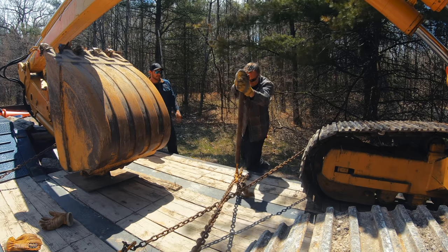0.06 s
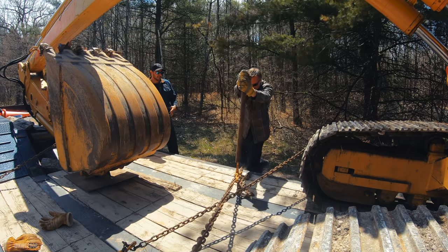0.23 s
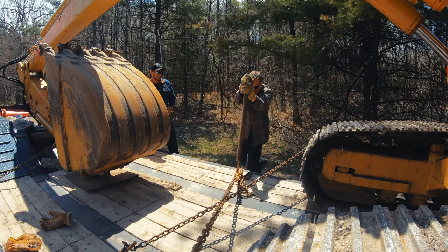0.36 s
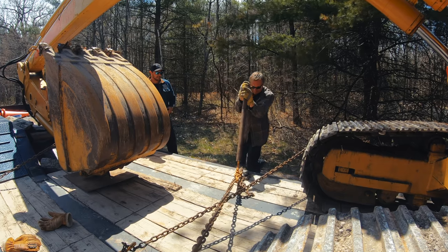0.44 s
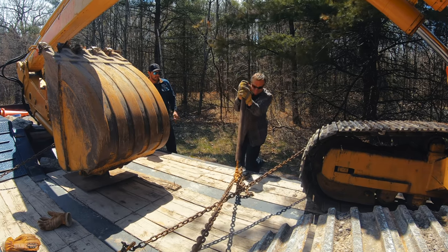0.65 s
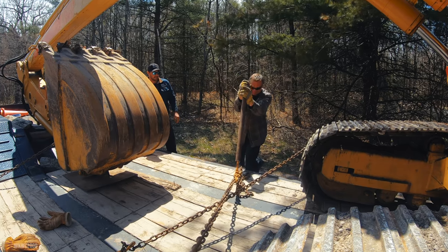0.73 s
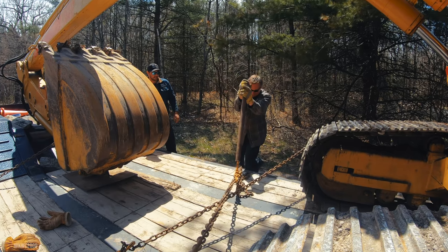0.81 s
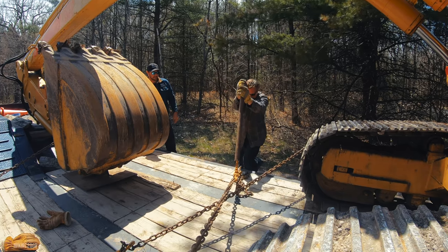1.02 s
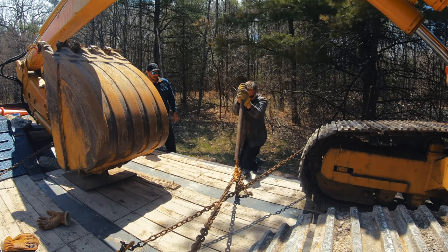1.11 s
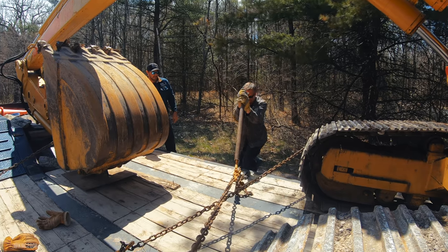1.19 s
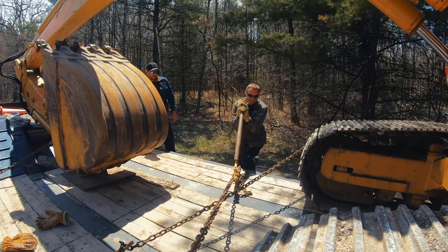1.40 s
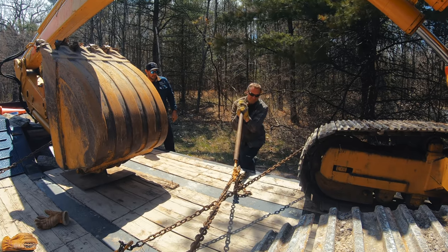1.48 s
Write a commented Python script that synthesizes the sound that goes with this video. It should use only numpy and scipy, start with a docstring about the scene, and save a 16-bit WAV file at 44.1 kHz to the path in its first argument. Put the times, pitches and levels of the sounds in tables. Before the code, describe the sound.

Steel lever binder snaps closed with a knock and booming clank, then chain links rattle and settle outdoors

```python
"""Outdoors by a wood, close to a wooden trailer deck: a lever chain binder is forced shut with a bar.
Faint scuffs come first, then a tick and dull knock, a sharp clack and the heavy clank that booms the deck.
The taut chain rattles and rings; then loose links clink, and the bar and chain scuff and bump as they settle.
Blows are decaying noise bands, steel is decaying sines; trees and deck reflect the work to the microphone.
Throughout there is outdoor air, a faint far drone and hiss; light wind rocks the microphone."""
import sys
import numpy as np
from scipy import signal
from scipy.io import wavfile

SR = 44100
rng = np.random.default_rng(int(sys.argv[2]) if len(sys.argv) > 2 else 0)


def transcribe(signal):
    """Save signal, clipped to [-1, 1], as a 16-bit WAV file at the path in sys.argv[1]."""
    frames = np.atleast_2d(signal).T
    limited = np.clip(frames, -1, 1)
    pcm = np.round(limited * 32767).astype(np.int16)
    wavfile.write(sys.argv[1], SR, pcm)


N = 68355
T = np.arange(N) / SR

# Binder blows. Each: start in seconds, level in dB.
KNOCK, CLACK, CLANK = (.2285, -12.5), (.3188, -12), (.3635, -8)
# Spectrum of each blow. Each row: frequency in Hz, relative level per Hz in dB.
KNOCK_COLOUR = [(40, 5), (180, 2.5), (350, -1.5), (600, 0.5), (950, 0.5), (1350, 6.5), (2000, -7.5),
                (3000, -8.5), (4200, -24.5), (8000, -31.5), (15000, -42.5)]
CLACK_COLOUR = [(100, -18.5), (450, -6.5), (950, -11.5), (1330, 7.5), (1600, -6.5), (2100, 3), (2700, -4),
                (3400, -12), (5000, -13), (9000, -23.5), (15000, -23)]
CLANK_COLOUR = [(30, 0), (50, 7), (90, 9.5), (200, 10.5), (450, -4), (900, 1), (1350, 1), (2100, 4.5),
                (3000, -13.5), (5500, -6), (8500, -9.5), (10500, -24.5), (13500, -10), (16000, -22)]
# Ringing time of each blow. Each row: frequency in Hz, time to fall 60 dB in seconds.
KNOCK_DECAY = [(100, 0.35), (400, 0.46), (1200, .13), (3000, 0.087), (12000, 0.086)]
CLACK_DECAY = [(300, 0.59), (1300, .1), (4000, .08), (12000, 0.027)]
CLANK_DECAY = [(60, 0.47), (220, 0.12), (450, .22), (1300, 0.091), (4000, 0.12), (12000, .06)]
BUILD_CYCLES = 0.4  # time constant of a blow's swell, in cycles, so the lows come later
# First touch of steel before the knock; its level is that of the noise before the high-pass.
TICK_S, TICK_DB, TICK_T60_S = .2272, -21.5, 0.0059

# Deck modes under the clank. Each row: frequency in Hz, level in dB, time to fall 60 dB in seconds.
DECK_MODES = [(41.43, -15, 0.74), (66.1, -7, .52), (101.1, -12, 0.35), (190.1, -13, .22), (206.6, -1, .06),
              (237.5, -17.5, .14), (263.3, -30.5, 0.95), (352.9, -19.5, 0.34), (394.8, -21.5, 0.35),
              (461.5, -21, 0.19), (606, -26, .25)]
DECK_LAG_S = 0.0021  # after the clank

# Links slam together. Each row: start in seconds, level in dB, strongest pitch in Hz.
SLAMS = [(0.35, -20, 4400), (0.3659, -19.5, 8300), (.3685, -21.5, 6000), (.384, -26.5, 4800),
         (.405, -21, 5000), (0.421, -22.5, 5200), (.432, -22, 5300), (0.4397, -23, 4700),
         (0.4504, -21, 5000), (.4545, -20, 5500), (.469, -26.5, 5000), (.486, -20, 4600), (.490, -19, 5200),
         (0.5211, -18, 5200), (.526, -20, 5000)]
SLAM_PEAK_DB, SLAM_PEAK_OCTAVES = 7.5, 0.075  # boost around the strongest pitch, and its spread
# Spectrum of the links. Each row: frequency in Hz, relative mode level in dB.
LINK_COLOUR = [(150, -5), (500, -5), (800, -4.5), (1200, 4), (1600, -8), (2100, -1.5), (2900, -2),
               (3500, 0), (4000, -2.5), (5100, 3.5), (6500, -10), (8500, -3.5), (11000, -18),
               (14000, -11.5), (16000, -25)]
# Ringing time of the links. Each row: frequency in Hz, typical time to fall 60 dB in seconds.
LINK_DECAY = [(300, 0.079), (1300, .16), (5000, 0.09), (12000, 0.062)]
LINK_DECAY_SPREAD = 0.41  # standard deviation of the log of the ringing time
CRACK_DB, CRACK_T60_S = -1.5, 0.035  # the first instant of a contact, relative to its ring
# Modes of chain and binder. Each row: frequency in Hz, level relative to the contacts in dB,
# time to fall 60 dB in seconds.
STEEL_MODES = [(1215, -20, .25), (1260, -18, .36), (1372, -17, .2), (2007, -19, .2), (2396, -24, .25),
               (2514, -25, .3), (3338, -14, .2), (3614, -11, .15), (4435, -21, .36), (4680, -15, .15),
               (5087, -15, .17), (5170, -17, .27), (6119, -16, .13), (7370, -19, .11), (8380, -18, .09),
               (9850, -26, .12), (12660, -37, .22)]
STEEL_BEAT_HZ = 9  # offset of each mode's weaker twin
# The chain shivers after the clank: start, steady time, then fall of 60 dB; contact rate and mean level.
SHIVER_START_S, SHIVER_HOLD_S, SHIVER_T60_S, SHIVER_PER_S, SHIVER_DB = .372, 0.045, 0.1, 500, -32.5

# Single links ping. Each row: start in seconds, sine level in dB, pitch in Hz, time to fall 60 dB in seconds.
CLINKS = [(0.3476, -8.5, 4345, 0.028), (.5262, -13, 3640, 0.037), (0.644, -41.5, 1248, 0.35),
          (.894, -47.5, 3746, 0.067), (.913, -49.5, 3534, 0.086), (0.916, -54, 4450, 0.04),
          (.917, -63, 5100, 0.054), (1.018, -54, 3680, 0.056), (1.114, -58, 3220, 0.028),
          (1.142, -46, 2306, 0.048), (1.152, -47, 929, 0.14), (1.501, -55.5, 8440, 0.095),
          (1.51, -59, 2380, 0.14)]
CLINK_RASP, CLINK_RASP_WIDTH = .8, 1.12  # rasp gain beside the sine; band edges as a ratio to the pitch

# Scuffs of bar and chain. Each row: start in seconds, level before softening in dB,
# time to fall 60 dB in seconds, centre in Hz.
SCUFFS = [(.01, -48, 0.13, 640), (0.178, -52, 0.08, 1000), (.645, -47, 0.18, 2500), (0.723, -41, .13, 2480),
          (.895, -45.5, .1, 2500), (.912, -43.5, 0.11, 1730), (1.14, -45.5, 0.11, 1800),
          (1.213, -48, 0.16, 1470), (1.262, -56, .3, 2500), (1.328, -44, 0.12, 1554),
          (1.352, -52, 0.27, 1082), (1.481, -58, 0.17, 1200)]
# Soft bumps on the planks. Each row: start in seconds, level before softening in dB,
# time to fall 60 dB in seconds, centre in Hz.
BUMPS = [(.19, -44.5, 0.16, 390), (.75, -36.5, 0.21, 396), (.752, -42.5, .35, 170), (.925, -49, 0.23, 192),
         (1.119, -34.5, 0.15, 150), (1.12, -45, .14, 593), (1.33, -45.5, 0.28, 452)]
# Fine scraping as the bar is drawn back: start in seconds, level in dB, time to fall 60 dB in seconds.
SLIDE, SLIDE_HZ = (1.2, -64.5, 1.28), 7950
SCUFF_WIDTH, BUMP_WIDTH = 1.4, 1.45  # band edges as a ratio to the centre
SCUFF_RISE_S, SCUFF_ROUGH_DB = 0.0099, 3  # swell time constant; rms wobble of the grain

# Bright reflections from the machine and the deck.
NEAR_DB, NEAR_HZ, NEAR_T60_S = -23, 3500, 0.33
# Spectrum of the trees' echo. Each row: frequency in Hz, relative level per Hz in dB.
WOOD_COLOUR = [(60, -7), (220, 4), (500, -1), (1200, -1), (2600, 2), (5000, -7.5), (8000, -14),
               (15000, -27)]
# Length of the trees' echo. Each row: frequency in Hz, time to fall 60 dB in seconds.
WOOD_DECAY = [(100, 1.1), (250, 1.4), (500, 1.3), (1500, .95), (4000, .7), (12000, .5)]
WOOD_DB = -27.0206
ECHO_RISE_S = 0.025  # swell time constant, for the trees and the near reflections
# Brief high-passed noise following the sounds, opposite in sign on the two sides.
SIDE_DB, SIDE_HZ, SIDE_T60_S = -33.5, 10000, .02

# Spectrum of the outdoor air. Each row: frequency in Hz, relative level per Hz in dB.
AIR_COLOUR = [(24, -51.5), (40, -19.5), (91, -2), (133, -26.5), (231, -7), (276, -34), (615, -18.5),
              (680, -26.5), (3140, -43.5), (3650, -27), (4130, -50.5), (16000, -49.5)]
AIR_DB = -51.5
HUM_HZ, HUM_WIDTH_HZ, HUM_DB = 209, 8.9, -57  # a faint far drone
WIND_DB, WIND_HZ, WIND_RISE_S = -28.5, 11, 0.084  # level before the fade in and out
HISS_DB = -75  # microphone hiss, different on each side
CUTOFF_HZ, CEILING = 15750, .98  # top of the recorded band; full-scale limit


def binder():
    """The bar seats with a tick and a knock, the lever clacks over centre and slams home."""
    tick = at(TICK_S, TICK_DB, noise(3000, "high") * dying(TICK_T60_S))
    knock = at(*KNOCK, burst(KNOCK_COLOUR, KNOCK_DECAY))
    clack = at(*CLACK, burst(CLACK_COLOUR, CLACK_DECAY))
    clank = at(*CLANK, burst(CLANK_COLOUR, CLANK_DECAY))
    return tick + knock + clack + clank


def burst(colour, decay):
    """Crowded modes of a struck body: each band swells and dies; about rms 1 over the first 10 ms."""
    out = np.zeros(N)
    for hz, band in bands(colour):
        swell = 1 - np.exp(-T * hz / BUILD_CYCLES)
        out += band * swell * dying(at_hz(decay, hz))
    return out / np.std(out[:SR // 100])


def deck():
    """The clank pulls on the deck, which booms in its own decaying modes."""
    boom = sum(from_db(db) * mode(hz, t60) for hz, db, t60 in DECK_MODES)
    return -at(CLANK[0] + DECK_LAG_S, 0, boom)  # minus: a pull


def chain():
    """Slams and a dense shiver of small contacts set the links crashing and the steel ringing."""
    hz, rows = links()
    crash = sum(play(clicks([(s, db)]), contact(hz, rows, peak_hz)) for s, db, peak_hz in SLAMS)
    tremor = shiver()
    pitches = np.geomspace(3400, 8400, 5)
    for k, peak_hz in enumerate(pitches):  # the contacts take turns among five pitches
        crash += play(clicks(tremor[k::len(pitches)]), contact(hz, rows, peak_hz))
    for mode_hz, level_db, t60 in STEEL_MODES:
        # each slam excites each mode by a different amount
        force = clicks((s, db + rng.normal(0, 4.7)) for s, db, _ in SLAMS) + clicks(tremor)
        ring = mode(mode_hz, t60) + .5 * mode(mode_hz + STEEL_BEAT_HZ, t60)
        crash += from_db(level_db) * play(force, ring)
    return crash


def shiver():
    """Small contacts of the shaken chain, steady and then weakening: rows of (s, dB)."""
    count = 200
    chance = rng.random((count, 2))
    age = (np.arange(count) + chance[:, 0]) / SHIVER_PER_S
    fall_db = 60 * np.maximum(age - SHIVER_HOLD_S, 0) / SHIVER_T60_S
    level_db = SHIVER_DB + 10 * (chance[:, 1] - .5) - fall_db
    return np.column_stack([SHIVER_START_S + age, level_db])


def links():
    """Crowded modes of many links: (pitches, one ringing row per mode)."""
    count = 480
    hz = 150 + 15800 * (np.arange(count) + rng.random(count)) / count
    t60 = at_hz(LINK_DECAY, hz) * np.exp(LINK_DECAY_SPREAD * rng.standard_normal(count))
    t = T[:SR // 3].astype("f")  # a third of a second, single precision
    sines = np.sin(np.outer(2 * np.pi * hz.astype("f"), t))
    return hz, sines * np.exp(-np.outer((np.log(1000) / t60).astype("f"), t))


def contact(hz, rows, peak_hz):
    """One contact: a crack and a ring, with its own mix of modes, boosted near one pitch."""
    octaves = np.log2(hz / peak_hz)
    peak_db = SLAM_PEAK_DB * np.exp(-.5 * (octaves / SLAM_PEAK_OCTAVES) ** 2)
    mix = from_db(at_hz(LINK_COLOUR, hz) + peak_db) * rng.standard_normal(len(hz))
    ring = mix.astype("f") @ rows
    ring = ring * (1 + from_db(CRACK_DB) * dying(CRACK_T60_S)[:len(ring)])
    return ring / np.std(ring[:SR // 100])


def clinks():
    """Single links ring briefly: a decaying sine with a rasp of narrow noise."""
    out = np.zeros(N)
    for s, db, hz, t60 in CLINKS:
        rasp = CLINK_RASP * rub(hz, CLINK_RASP_WIDTH, t60)
        out += at(s, db, mode(hz, t60) + rasp)
    return out


def scuffs():
    """Friction noise: rubs, soft bumps and a fine scrape as the bar and the chain settle."""
    rubs = sum(at(s, db, rub(hz, SCUFF_WIDTH, t60)) for s, db, t60, hz in SCUFFS)
    bumps = sum(at(s, db, rub(hz, BUMP_WIDTH, t60)) for s, db, t60, hz in BUMPS)
    s, db, t60 = SLIDE
    slide = at(s, db, rub(SLIDE_HZ, SCUFF_WIDTH, t60))
    return filtered(rubs, 5500, "low") + filtered(bumps, 1500, "low") + slide


def rub(hz, width, t60):
    """Grainy friction in a band around one pitch, swelling and dying."""
    grain = from_db(SCUFF_ROUGH_DB * rms_one(noise(240, "low")))
    band = noise([hz / width, hz * width], "band", order=1)
    return rms_one(band * grain) * dying(t60) * (1 - np.exp(-T / SCUFF_RISE_S))


def nearby(x):
    """Steel and planks close by add a short, bright shimmer."""
    echo = noise(NEAR_HZ, "high", order=1) * dying(NEAR_T60_S) * (1 - np.exp(-T / ECHO_RISE_S))
    return from_db(NEAR_DB) * play(x, echo / np.linalg.norm(echo))


def side_treble(x):
    """Faint treble noise follows each sound, opposite on the two sides, widening the top a little."""
    burr = noise(SIDE_HZ, "high") * dying(SIDE_T60_S)
    side = from_db(SIDE_DB) * play(x, burr / np.linalg.norm(burr))
    return side * np.array([[1], [-1]])


def wood(x):
    """The trees scatter back a soft, dull tail."""
    tail = sum(band * dying(at_hz(WOOD_DECAY, hz)) for hz, band in bands(WOOD_COLOUR))
    tail = tail * (1 - np.exp(-T / ECHO_RISE_S))
    return from_db(WOOD_DB) * play(x, tail / np.linalg.norm(tail))


def background():
    """Outdoor air, a far drone and the slow pressure of the wind, all filtered noise."""
    air = from_db(AIR_DB) * rms_one(sum(band for hz, band in bands(AIR_COLOUR)))
    drone_band = [HUM_HZ - HUM_WIDTH_HZ / 2, HUM_HZ + HUM_WIDTH_HZ / 2]
    drone = from_db(HUM_DB) * rms_one(noise(drone_band, "band", order=1))
    swell = 1 - np.exp(-T / WIND_RISE_S)
    wind = from_db(WIND_DB) * rms_one(noise(WIND_HZ, "low", order=3))
    return air + drone + wind * swell * swell[::-1]  # the wind fades in at the start and out at the end


def hiss():
    """White microphone noise, independent on each side."""
    return from_db(HISS_DB) * rng.standard_normal((2, N))


def from_db(db):
    """Decibels to gain."""
    return 10 ** (np.asarray(db) / 20)


def rms_one(x):
    """Scale to rms 1."""
    return x / np.sqrt(np.mean(x ** 2) + 1e-20)


def at_hz(points, hz):
    """Read a table on a log-frequency axis."""
    table = np.array(points)
    return np.interp(np.log(hz), np.log(table[:, 0]), table[:, 1])


def filtered(x, hz, kind, order=2):
    """Butterworth filter."""
    return signal.sosfilt(signal.butter(order, hz, kind, fs=SR, output="sos"), x)


def noise(hz, kind, order=2):
    """Filtered white noise, already run in for half a second."""
    return filtered(rng.standard_normal(N + SR // 2), hz, kind, order=order)[-N:]


def dying(t60):
    """Exponential decay, 60 dB in t60 seconds."""
    return np.exp(-np.log(1000) * T / t60)


def bands(colour):
    """Third-octave noise bands with the given colour: (centre Hz, noise)."""
    edges = 22 * 2 ** (np.arange(30) / 3)
    for low, high in zip(edges, edges[1:]):
        hz = np.sqrt(low * high)
        yield hz, from_db(at_hz(colour, hz)) * noise([low, high], "band")


def mode(hz, t60):
    """One decaying sine."""
    return np.sin(2 * np.pi * hz * T) * dying(t60)


def clicks(rows):
    """Impulses from rows of (s, dB)."""
    out = np.zeros(N)
    for s, db in rows:
        out[int(s * SR)] += from_db(db)
    return out


def play(force, response):
    """Drive a body with a force."""
    return signal.fftconvolve(force, response)[:N]


def at(s, db, sound):
    """Start a sound at a time and level."""
    return from_db(db) * np.concatenate([np.zeros(int(s * SR)), sound])[:N]


def scene():
    """The work is heard from straight ahead, with its reflections and the place around it."""
    work = binder() + deck() + chain() + clinks() + scuffs()
    reflections = nearby(work) + wood(work)
    return work + reflections + side_treble(work) + background() + hiss()


def record(dry):
    """The loudest peaks are rounded off and the top is cut."""
    rounded = CEILING * np.tanh(dry / CEILING)
    return signal.sosfilt(signal.ellip(10, .1, 80, CUTOFF_HZ, fs=SR, output="sos"), rounded)


dry = scene()
out = record(dry)
transcribe(out)
```